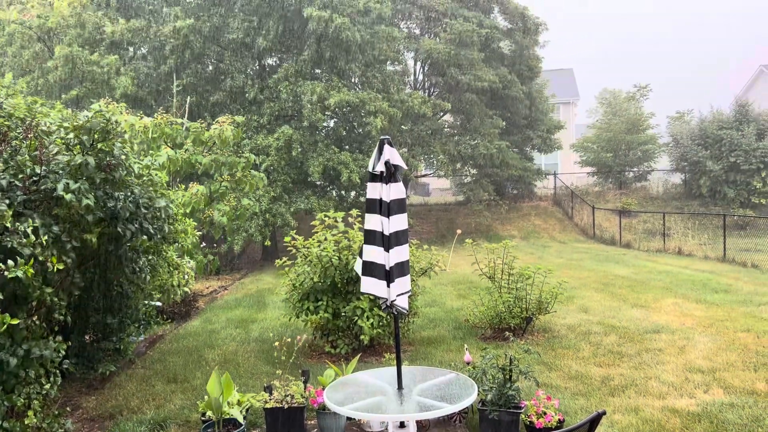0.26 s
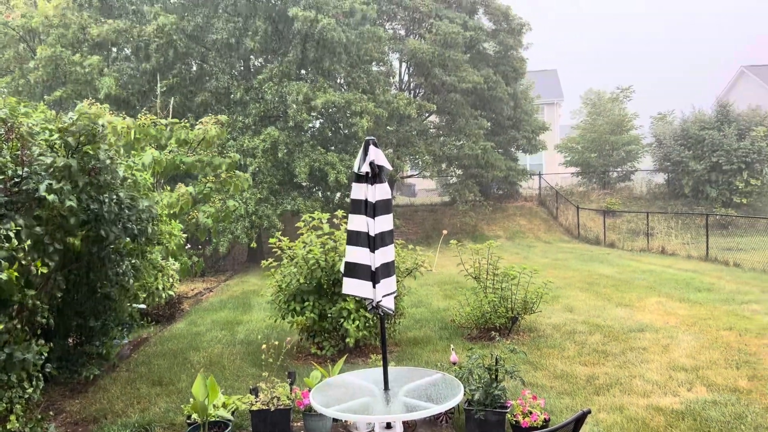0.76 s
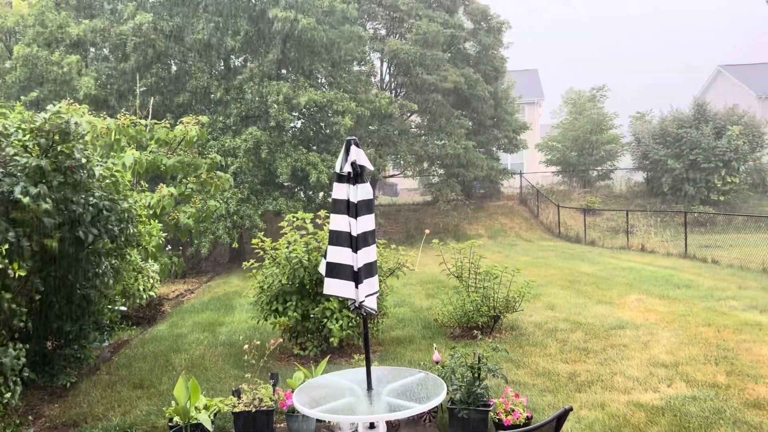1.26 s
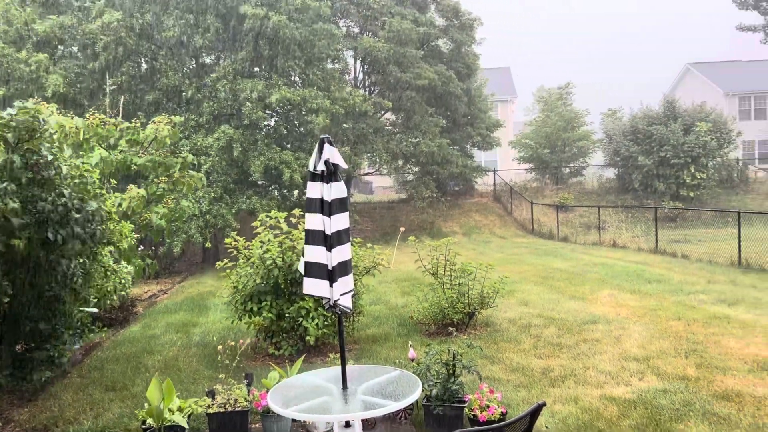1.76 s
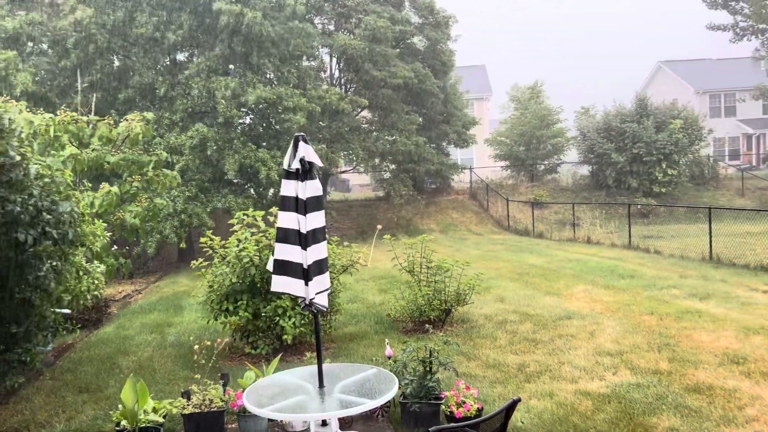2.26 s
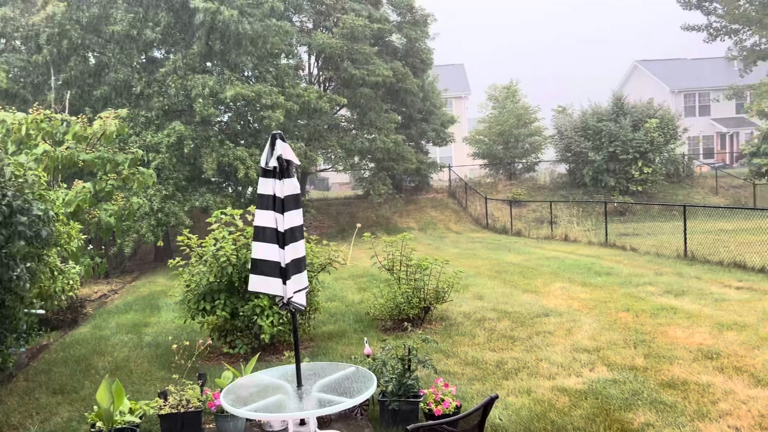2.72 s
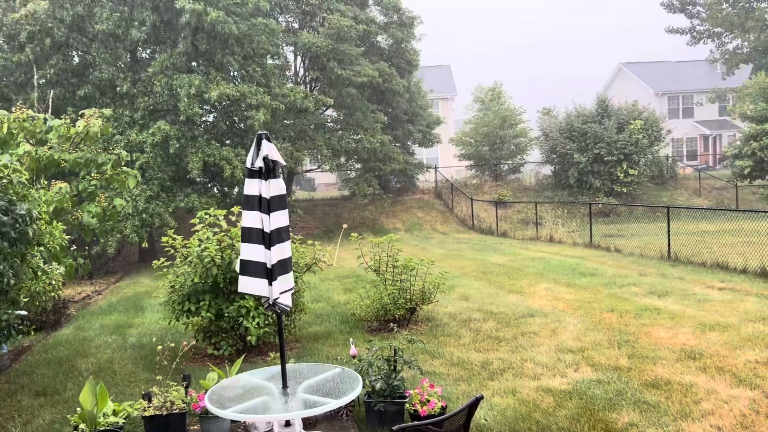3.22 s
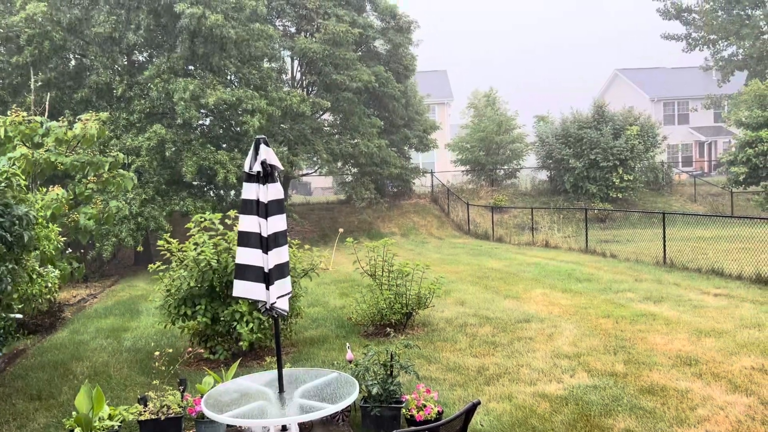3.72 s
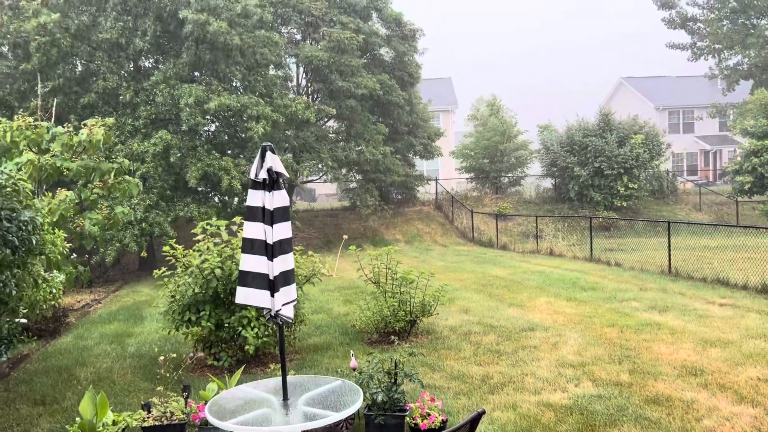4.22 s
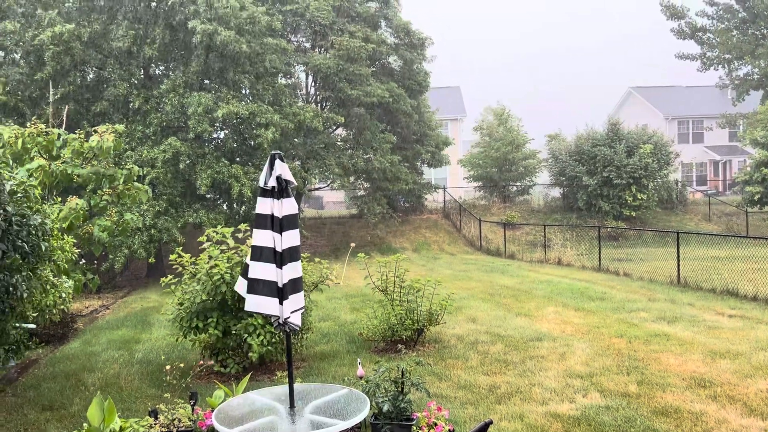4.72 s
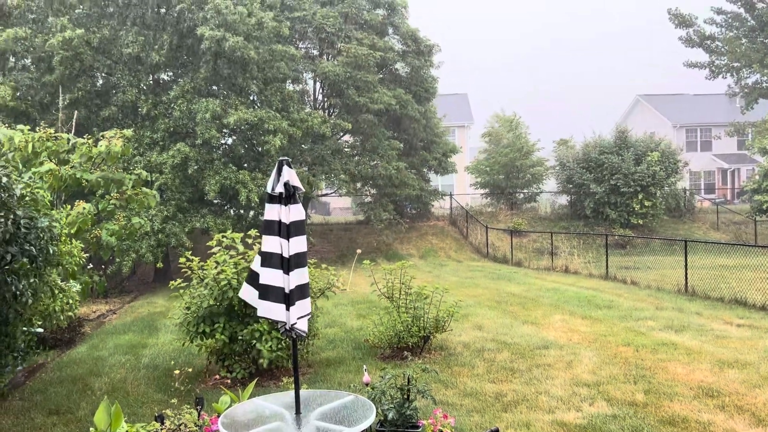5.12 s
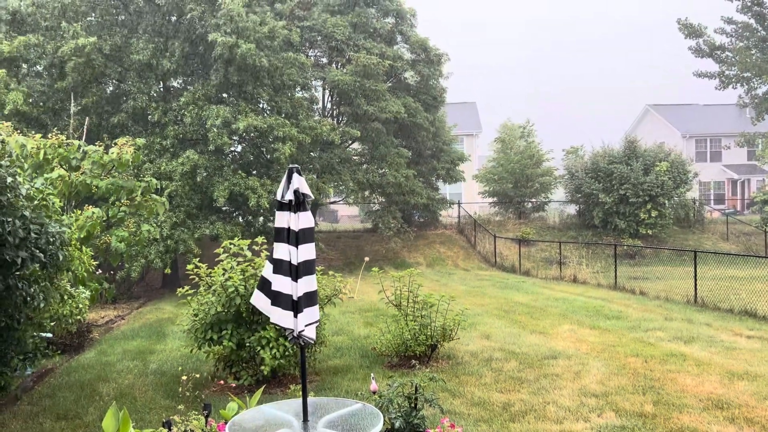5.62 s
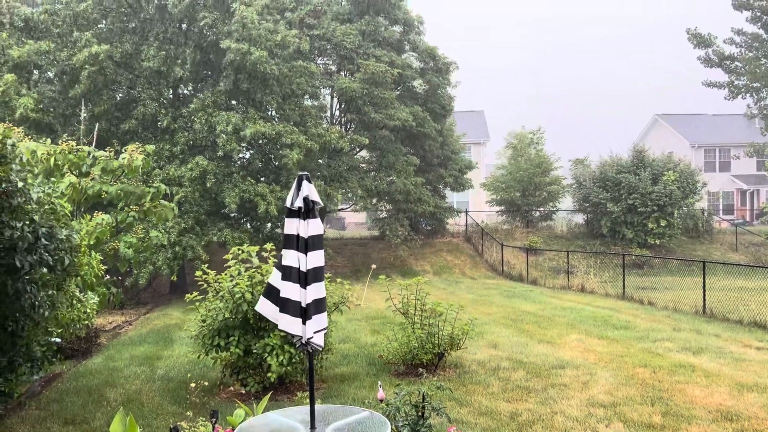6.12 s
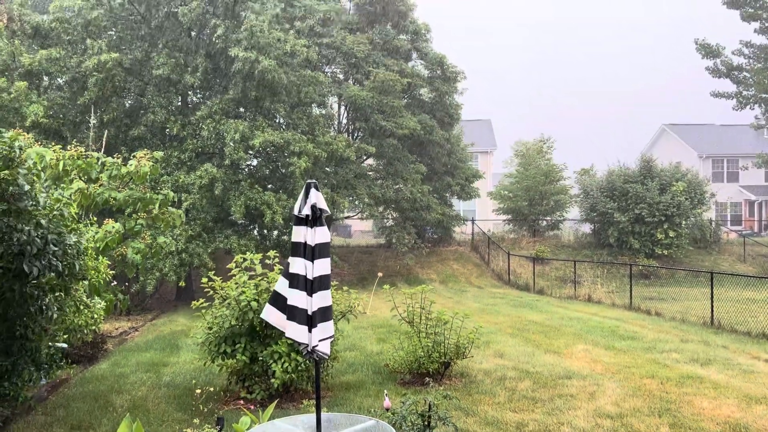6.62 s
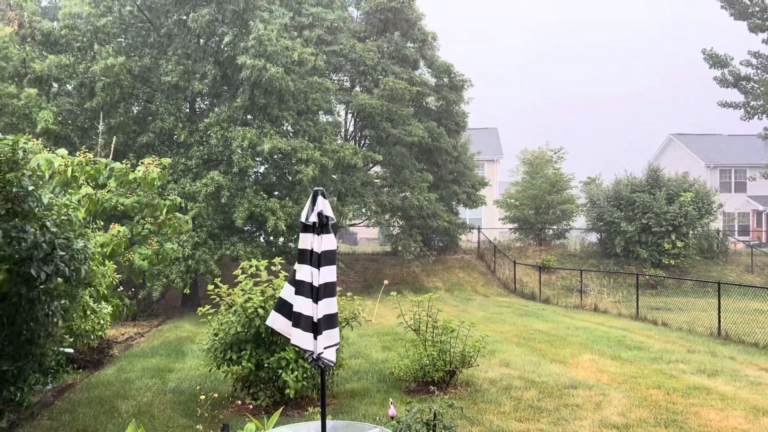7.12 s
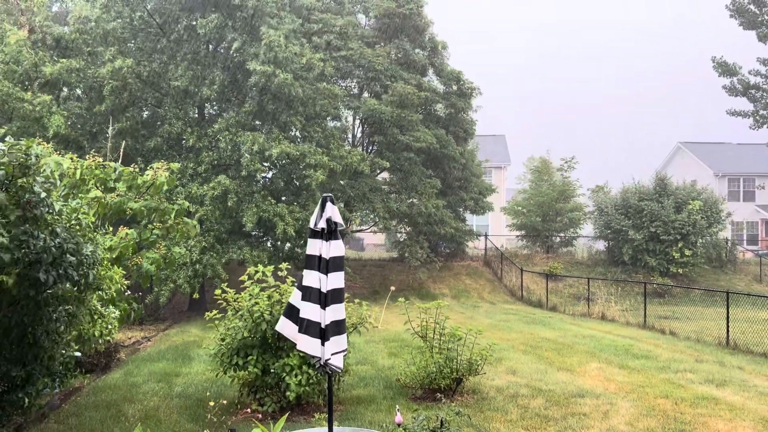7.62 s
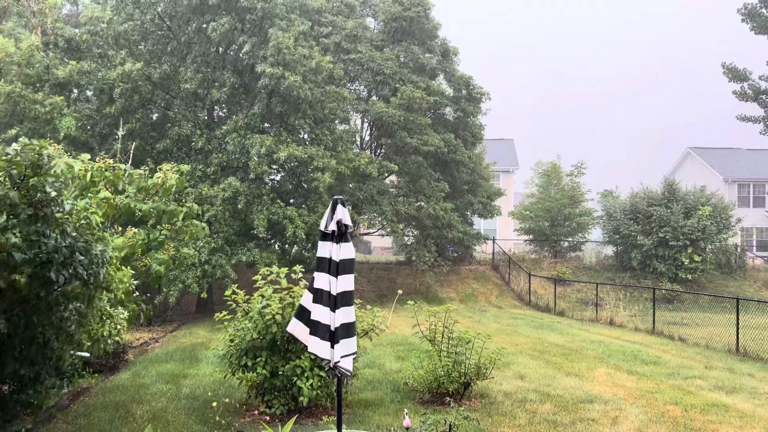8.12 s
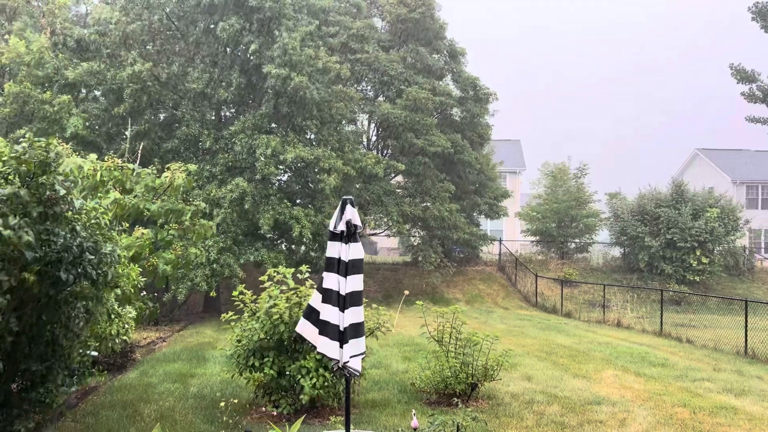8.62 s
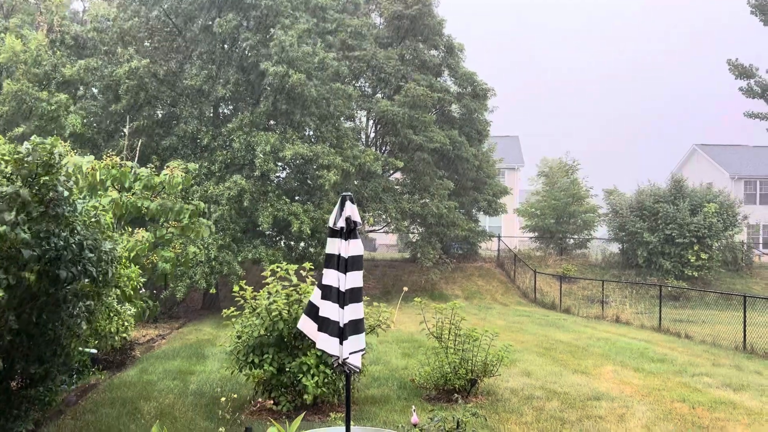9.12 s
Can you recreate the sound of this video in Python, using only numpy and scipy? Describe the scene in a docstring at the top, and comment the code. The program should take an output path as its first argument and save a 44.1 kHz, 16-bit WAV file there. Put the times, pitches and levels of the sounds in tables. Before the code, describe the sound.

Outdoor stereo capture from the back of a house: continuous rain hisses in trees and on lawn, with crisp pattering, watery drips, hollow plops and sharp little ticks up close. Thunder grumbles briefly at first, gives a short low bump around two seconds, goes quiet, then builds into a long uneven roll with deep thumps, peaking near six seconds and trailing off under the unbroken rain.

```python
"""Steady rain on leaves, lawn and patio, heard from the back of a house by two microphone ports.
Far rain is a wash of shaped noise. Nearer drops patter, drip, tap and splat as short dying waves.
Some close drops plop with a dull knock or tick with a tiny burst of bright noise.
Distant thunder arrives as short low pressure waves from each bend of the lightning channel:
many overlap into a rumble, and strong ones stand out as single thumps."""
import sys
import numpy as np
from scipy import signal
from scipy.fft import rfft, irfft, next_fast_len
from scipy.io import wavfile
from scipy.ndimage import uniform_filter1d

SR = 44100
rng = np.random.default_rng(int(sys.argv[2]) if len(sys.argv) > 2 else 0)


def store_pcm(level_fs):
    """Save levels as 16-bit WAV."""
    pcm = np.round(np.clip(level_fs, -1, 1) * 32767).astype(np.int16)
    wavfile.write(sys.argv[1], SR, np.atleast_2d(pcm).T)


N = 412776

# Rumble, swelling and fading in rolls.
# Each row: time in seconds, level in dB, slope above its strongest pitch in dB per octave.
RUMBLE_ROLLS = [(0.0, -27.5, -4.5), (0.15, -40, -10), (0.6, -51, -6), (1.1, -50, 0), (1.8, -50, -7),
                (2.0, -34, -3), (2.2, -42, -7), (2.35, -46, -5), (2.6, -46, -1.5), (2.9, -45, -6),
                (3.15, -57, -13), (3.4, -40, -8), (3.8, -47, 3), (4.1, -41.5, 0), (4.33, -43, 0),
                (4.42, -32, -5), (4.47, -41, -2), (4.55, -32, -6), (4.59, -39, -2), (4.66, -34, -7),
                (4.72, -35, -7), (4.82, -36, -4.5), (4.9, -36, -8), (4.97, -34, -10), (5.03, -36, -5),
                (5.22, -32.5, -7), (5.31, -33, -10), (5.4, -31.5, -5.5), (5.44, -38, -5), (5.51, -36, -10),
                (5.58, -35, -6), (5.68, -38, -8), (5.8, -35.5, -4.5), (6.0, -34.5, -5), (6.06, -36, -2),
                (6.12, -34, -6), (6.18, -30, -7), (6.26, -33, -3), (6.32, -36, -3), (6.43, -30, -3.5),
                (6.55, -37, -2), (6.62, -51, -1), (6.75, -37.5, -1), (6.85, -44, -1), (7.0, -42, -9),
                (7.2, -45.5, -5), (7.42, -36.5, -4), (7.58, -51, -9), (7.68, -48, 1), (7.75, -46, -12),
                (7.83, -41, -3), (8.0, -46, -3), (8.25, -39.5, -3), (8.5, -38, -6), (8.57, -47, -11),
                (8.63, -41, -4), (8.7, -57, -11), (8.8, -47, -6), (8.92, -58, -12), (9.1, -38, -1),
                (9.18, -48, -1), (9.27, -40, 2), (9.36, -58, -12)]
# Single thumps of thunder. Each row: middle in seconds, rough peak in dB, pitch in Hz, length in cycles.
THUNDER_THUMPS = [(0.029, -29, 71, 2.6), (0.052, -24, 167, 1.2), (0.064, -20, 64.6, 1.8),
                  (0.075, -34, 168, 1.9), (0.102, -30, 272, 0.6), (0.135, -31, 153, 0.54),
                  (0.201, -31, 113, 1.6), (0.246, -26, 330, 0.6), (0.306, -24, 330, 0.6),
                  (0.407, -24, 137, 1.2), (0.458, -32, 64, 1.2), (0.998, -27, 300, 0.9),
                  (1.06, -29, 330, 0.6), (1.079, -34, 300, 0.6), (1.175, -31, 78, 1.9),
                  (1.204, -32.5, 264, 5.2), (1.415, -28, 153, 0.98), (1.626, -33, 96, 2.9),
                  (1.942, -29, 273, 0.99), (1.948, -21, 101, 1.1), (1.981, -16.5, 135, 0.9),
                  (2.03, -24, 298, 0.97), (2.047, -30, 114, 1.3), (2.068, -24, 210, 1.3),
                  (2.075, -27, 78, 1.4), (2.088, -34, 204, 1.4), (2.128, -34, 94, 1.3),
                  (2.141, -26, 272, 1.3), (2.216, -28, 153, 0.88), (2.251, -26, 114, 1.9),
                  (2.289, -26, 153, 0.8), (2.388, -31.5, 114, 1.3), (2.591, -29, 152, 1.3),
                  (2.714, -33, 114, 1.4), (2.849, -22, 244, 1.3), (2.853, -30, 123.7, 1.7),
                  (2.872, -21.5, 244, 1.6), (2.914, -32, 88, 2), (2.957, -28, 114, 1),
                  (4.211, -30.5, 79, 3.5), (4.247, -32, 104, 1.3), (4.383, -27, 104, 1),
                  (4.416, -24.5, 71, 2.1), (4.495, -23, 105, 0.57), (4.529, -21, 95, 1.1),
                  (4.546, -24, 60.6, 1.8), (4.613, -30, 90, 1.2), (4.643, -28, 63.5, 2.4),
                  (4.69, -29, 79, 1.9), (4.741, -31, 64, 2.6), (4.782, -24, 78, 0.9),
                  (4.811, -18.5, 77.6, 1), (4.843, -32, 71, 2.1), (4.928, -27, 167, 1.3),
                  (4.959, -25, 86, 0.76), (4.989, -29, 168, 2.4), (5.0, -38, 64, 2.6),
                  (5.044, -30, 127, 1.9), (5.076, -32, 86, 2.1), (5.126, -18, 95, 1.2),
                  (5.188, -24, 114, 1.1), (5.213, -23, 71, 1.2), (5.236, -21, 115, 0.91),
                  (5.254, -29, 114, 1.9), (5.342, -28, 127, 1.5), (5.371, -36, 71, 1.2),
                  (5.4, -21.5, 64, 1.5), (5.457, -25, 72, 1.2), (5.472, -24.5, 128, 1.8),
                  (5.485, -26, 190, 1.3), (5.5, -30, 70, 1.1), (5.525, -23.5, 80, 1.6),
                  (5.614, -25, 139, 1.3), (5.634, -29, 126, 0.73), (5.669, -29.5, 185, 2.4),
                  (5.678, -21.5, 86, 1.1), (5.72, -29, 86, 1.3), (5.815, -33, 58, 2.4),
                  (5.888, -31, 65, 2.3), (5.945, -29.5, 71, 1.5), (5.978, -29, 86, 1.1),
                  (6.013, -30.0, 86, 2.2), (6.086, -19, 77.4, 1.8), (6.11, -22, 139, 2.1),
                  (6.135, -21, 72, 1.3), (6.153, -16, 120, 1), (6.164, -16.5, 187.3, 0.8),
                  (6.18, -11, 78, 1.4), (6.198, -23, 185, 0.6), (6.218, -23, 336, 1.3),
                  (6.224, -16, 72, 1.1), (6.25, -33, 58, 1.3), (6.278, -22.5, 85, 1.3),
                  (6.351, -29, 153, 2.6), (6.365, -34, 58, 2.6), (6.391, -18.5, 139, 1.2),
                  (6.42, -22.5, 93.5, 3.1), (6.441, -20, 178, 2.5), (6.458, -36, 64, 1.9),
                  (6.491, -24, 219, 1.1), (6.559, -36, 64, 2.3), (6.663, -22, 184, 0.87),
                  (6.69, -35, 58, 2), (6.777, -24, 166, 0.7), (6.82, -30, 272, 1.1),
                  (6.933, -27.5, 71, 1.3), (7.003, -31, 94, 1.2), (7.07, -33, 71, 2.3),
                  (7.311, -21.5, 154, 0.78), (7.361, -28, 204, 0.87), (7.388, -29, 86, 2.7),
                  (7.451, -33, 94.5, 2.9), (7.461, -34, 245, 1.6), (7.67, -34, 140, 1.5),
                  (7.69, -33, 70, 1.5), (7.799, -27.5, 150, 0.9), (7.845, -34, 247, 0.6),
                  (8.08, -29, 140, 1), (8.105, -29, 78.4, 1.8), (8.209, -30.5, 205, 2.8),
                  (8.252, -28, 327, 0.6), (8.277, -24, 113.5, 0.69), (8.299, -27.5, 204, 1.1),
                  (8.326, -32, 94, 1.3), (8.376, -28, 103, 2.1), (8.388, -34, 330, 0.75),
                  (8.425, -32, 185, 1.3), (8.437, -31, 86, 1), (8.475, -30, 153, 0.65),
                  (8.495, -32.5, 153, 2.3), (8.535, -36, 70, 1.6), (8.605, -31, 85, 1.4),
                  (8.639, -30, 150, 0.91), (8.761, -31, 70.4, 2.5), (9.008, -31, 77.3, 2.1),
                  (9.059, -31, 64, 2.2), (9.088, -31, 114, 1.2), (9.259, -41, 226, 2.6)]
# Weak returns of each thump from the houses. Each row: delay in seconds, level against the thump in dB.
HOUSE_RETURNS = [(.019, -16), (.034, -17), (.055, -18)]
# Strength of the shower. Each row: time in seconds, level in dB before the layers are mixed.
SHOWER_STRENGTH = [(0.0, -35), (0.23, -35), (2.01, -34.5), (2.42, -36.5), (3.13, -36.5), (3.78, -37.5),
                   (4.61, -36.5), (5.37, -37.5), (5.55, -37.5), (6.44, -37.5), (6.91, -36.5), (7.53, -36.5),
                   (8.39, -36), (9.36, -35)]
# Tone of the far rain. Each row: frequency in Hz, relative level in dB per Hz.
WASH_TONE = [(25, -40), (60, 0.5), (150, 0), (300, -3), (550, -4), (850, 0.5), (1050, -2.5), (1300, -2),
             (1550, -2.5), (2000, -7), (3000, -10), (5000, -12), (6000, -16), (9000, -17), (13000, -21),
             (15800, -19.5)]
# The hollow middle of the rain. Each row: time in seconds, level against the shower in dB.
HOLLOW_SWELL = [(0, 0), (.6, -.5), (.9, 1.5), (1.3, 1), (1.9, 1), (2.6, -0.5), (3.2, 0), (3.9, -1),
                (4.5, 0), (5.2, 0.5), (6, 0), (6.8, 0.5), (7.5, 0), (8, 0), (8.2, 1), (8.45, 1), (8.65, .5),
                (9, 1), (9.36, 0.5)]
# Drips into wet hollows. Each row: pitch in Hz, relative level in dB.
DRIP_TONE = [(450, -16), (900, 10.5), (2000, 5), (5000, -30), (9000, 4)]
# Drops on leaves and stone. Each row: pitch in Hz, relative level in dB.
PATTER_TONE = [(500, -2.5), (900, 5.5), (2000, 1.5), (4000, -6), (7000, -2.5), (12000, -0.5), (15000, -16)]
# Fat drops on the patio. Each row: time in seconds, level of the knock in dB, pitch in Hz.
PATIO_PLOPS = [(0.048, -21, 860), (0.073, -28, 912), (0.155, -30, 1470), (0.239, -22, 926),
               (0.299, -29, 760), (0.306, -31, 1100), (0.335, -32, 800), (0.464, -22, 850),
               (0.495, -25, 1770), (0.667, -24, 915), (0.719, -26, 1030), (0.885, -24, 1070),
               (0.966, -28, 900), (1.036, -21, 840), (1.098, -21, 1365), (1.252, -22.5, 754),
               (1.309, -29, 934), (1.365, -21, 1040), (1.466, -34, 969), (1.509, -36, 820),
               (1.606, -28, 1260), (1.817, -28, 886), (1.971, -28, 1265), (2.224, -30, 818),
               (2.301, -36, 1130), (3.039, -20, 1030), (3.114, -30, 910), (3.165, -21, 1650),
               (3.696, -21.5, 1310), (4.219, -20, 1350), (4.325, -25, 1040), (4.648, -24, 1060),
               (4.695, -23, 920), (4.811, -22, 900), (5.197, -29, 1210), (5.618, -23, 1060),
               (5.707, -23.5, 760), (6.074, -22.5, 930), (6.542, -26, 716), (6.859, -23, 945),
               (7.779, -22, 980), (7.953, -29, 940), (8.115, -28, 734), (8.231, -29, 880),
               (8.461, -22, 805), (8.501, -29, 867), (9.187, -24, 950)]
# Close drops. Each row: time in seconds, level of the splash in dB, thin fizz against splash in dB.
CLOSE_TICKS = [(0.1326, -20, -2), (0.2299, -22, -7), (0.2685, -24, 0), (0.5874, -22, -5), (0.816, -27, 4),
               (0.8425, -20, -6), (0.861, -28, -6), (0.889, -32, -6), (1.2201, -30, 2), (1.347, -20, 4.5),
               (1.4394, -28, -9), (1.6132, -30, 0), (1.6836, -26, -7), (1.8597, -23, -8), (2.0797, -22, -1),
               (2.7596, -27, -8), (2.868, -25, -6), (2.895, -25, -6), (3.0185, -27, -3), (3.274, -30, 3),
               (3.3772, -21, 3), (3.5573, -26, 2), (3.683, -26, 13), (4.144, -26, 4), (4.1624, -23, -3),
               (4.192, -29, 4), (4.482, -33, 2), (4.591, -26, 0), (4.6124, -24, 0), (4.618, -28, -8),
               (4.9492, -25, 2), (5.535, -24, -6), (5.5388, -22, -4), (7.001, -36, -11), (7.3043, -25, -4),
               (7.6143, -23, -11), (7.6187, -26, 1), (7.9064, -28, 2), (8.1529, -27, -4), (8.3484, -31, 2),
               (8.4756, -26, 2), (8.8418, -26, -7), (9.028, -23, -5)]
# Stereo spread by frequency. Each row: frequency in Hz, likeness of left and right from 0 to 1,
# phase lead of the right channel in radians.
STEREO_SPREAD = [(60, 0.8, .01), (350, 0.62, -0.16), (750, 0.24, -0.27), (1230, 0.13, 0.67),
                 (1560, 0.62, 2), (1850, 0.93, 0), (2260, 0.7, 0.4), (3100, 0.72, -1.2), (4870, 0.56, 0),
                 (5500, .33, 1.4), (6600, 0.99, .02), (7340, 0.99, -0.1), (8540, 0.65, 1.43),
                 (9100, 1, 3.1), (10800, 1, 3.2), (11200, .6, 4.8), (11900, 1, 6.25), (13700, 1, 6.32),
                 (14400, .7, 7.8), (14800, 1, 9.3), (15800, 1, 9.5)]
# Stereo balance by frequency. Each row: frequency in Hz, left minus right in dB.
LEFT_OVER_RIGHT = [(350, .2), (770, 1.5), (1300, -.2), (1800, .5), (2740, 2.2), (4200, 3), (6400, .5),
                   (8000, 0)]

WAVES_PER_S = 420  # weak thunder waves in the rumble
TAPS_PER_S, DRIPS_PER_S, DROPS_PER_S, SPLATS_PER_S = 220, 650, 1300, 70
FRONT_DB = -17  # steep front of a thump against its main wave
TAP_DB = -11  # dull tap of a tick against its splash
CLUMP_DB = 2  # nearer drops come in clusters, shaken off the leaves
WALL_S, WALL_DB, WALL_HZ = 0.0075, -5.5, 2170  # the house wall returns near drops, duller
EDGE_HZ = 15750  # top of the band that is kept


def gain_of(db):
    """Turns decibels into a factor."""
    return 10 ** (np.asarray(db) / 20)


def evened(x):
    """Scales a signal to an average strength (rms) of 1."""
    return x / np.sqrt(np.mean(x ** 2) + 1e-20)


def read(points, hz, order=1):
    """Reads a column of a table at any frequency, with straight lines over log frequency."""
    table = np.transpose(points)
    return np.interp(np.log(hz + 1), np.log(table[0] + 1), table[order])


def follow(rows, order=1):
    """Reads a column of a time table, sample by sample."""
    table = np.transpose(rows)
    return np.interp(np.arange(N) / SR, table[0], table[order])


def wander(size):
    """Makes a slow random curve of rms 1, smoothed twice over this many samples."""
    once = uniform_filter1d(rng.standard_normal(N), size)
    return evened(uniform_filter1d(once, size))


def wavelet(hz, cycles, rise):
    """Makes a short wave that rises over a share of its length and dies away."""
    u = np.arange(max(round(2 * cycles * SR / hz), 4)) * hz / SR / cycles
    attack = 1 - np.exp(-u / max(rise, .01))
    fade = np.exp(-3 * u) * np.cos(np.pi * np.minimum(u / 4, .5))
    shape = attack * fade
    return shape / shape.max() * np.sin(2 * np.pi * cycles * u)


def scatter(pitches_hz, per_s, spread_db, cycles, rise, level_db, shared):
    """Drops wavelets at random moments, most small and a few large, on a direct and a side path."""
    happens = rng.random(N) < per_s / SR
    size = gain_of(spread_db * np.minimum(rng.exponential(1, N), 3.5)) * happens
    size = size * rng.choice([-1., 1.], N)
    kind = rng.integers(0, len(pitches_hz), N)
    side = rng.standard_normal(N)
    # the side path has the same moments at random strengths, plus a shifted set of its own
    own = (1 - np.clip(shared, 0, 1)) * np.roll(size, 9001)
    both = evened(np.array([size, size * side + own]))
    out = np.zeros((2, N))
    for k, hz in enumerate(pitches_hz):
        grain = wavelet(hz, cycles * rng.uniform(0.89, 1.77), rise)
        grain = grain / np.linalg.norm(grain)
        train = both * (kind == k) * gain_of(level_db(hz))
        out += signal.oaconvolve(train, grain[None], axes=1)[:, :N]
    return out


def rumble():
    """Many weak waves overlap; long paths through air keep only the lowest pitches."""
    above, below, top_hz = follow(RUMBLE_ROLLS, order=2), 14.0, 58  # slopes in dB per octave

    def level_db(hz):
        """Lets the level change with distance from the strongest pitch."""
        octaves = np.log2(hz / top_hz)
        return (above if octaves > 0 else below) * octaves

    waves = scatter(np.geomspace(40, 330, 12), WAVES_PER_S, 1.9, 2.25, 0.65, level_db, 0.75)
    # even out the chance level over a fifth of a second, then apply the rolls
    level = np.sqrt(uniform_filter1d((waves ** 2).mean(0), size=SR // 5))
    return gain_of(follow(RUMBLE_ROLLS)) * waves / level


def thumps():
    """Strong waves: a steep front, a pitch that sags into a slower pull, weak returns from the houses."""
    out = np.zeros(N)
    steps = np.arange(-3000, 3000)
    t = steps / SR
    for s, peak_db, hz, cycles in THUNDER_THUMPS:
        u = t * hz / max(cycles, .5)
        sagging = 2 * np.pi * hz * t * (1 - 0.16 * np.tanh(u))
        wave = np.exp(-2.8 * u ** 2) * np.sin(sagging + 0.48)
        # the front comes just before the middle of the wave
        front = np.exp(-((t + 0.29 * cycles / hz) / 0.00098) ** 2) * np.sin(2 * np.pi * 290 * t)
        thump = gain_of(peak_db) * (wave + gain_of(FRONT_DB) * front)
        at = round(s * SR) + steps
        out[at[at >= 0]] += thump[at >= 0]
    back = sum(gain_of(db) * np.roll(out, round(s * SR)) for s, db in HOUSE_RETURNS)
    return np.array([out + back, 0.1 * out + 0.36 * np.roll(out, 700)])


def wash():
    """Countless far drops: random short spectra with drifting patches and a treble flicker."""
    frames, hz = N // 128 + 6, np.fft.rfftfreq(512, 1 / SR)
    a, b, c, d, patches = rng.standard_normal((frames, 257, 5)).T
    patches = uniform_filter1d(patches, size=14, axis=0)  # across frequency
    patches = evened(uniform_filter1d(patches, size=8, axis=1))  # across time
    flicker = evened(uniform_filter1d(rng.standard_normal(frames), size=8))
    flicker_db = 1.14 * np.outer(hz / 10000, flicker)  # grows with frequency
    tone_db = read(WASH_TONE, hz)[:, None] + 0.96 * patches + flicker_db
    spectra = np.array([a + 1j * b, c + 1j * d]) * gain_of(tone_db)
    return evened(signal.istft(spectra, nperseg=512, noverlap=384)[1][:, :N])


def taps():
    """Short blunt taps on wet boards and broad leaves, only a cycle or two each."""
    return evened(scatter(np.geomspace(600, 3000, 10), TAPS_PER_S, 1.7, 1.4, 0.046, lambda hz: 0, 0.87))


def drips():
    """Drops into puddles and cupped leaves ring on for a dozen cycles or more."""
    pitches_hz = np.geomspace(450, 9000, 30)
    return evened(scatter(pitches_hz, DRIPS_PER_S, 2.7, 16.5, 0.018, lambda hz: read(DRIP_TONE, hz), 0.59))


def patter():
    """Nearer drops on leaves and stone, each a tap of a few cycles."""
    pitches_hz = np.geomspace(500, 15000, 22)
    return evened(scatter(pitches_hz, DROPS_PER_S, 3.4, 5.0, 0.094, lambda hz: read(PATTER_TONE, hz), 0.5))


def splats():
    """Sparse bright drops burst on the patio, each a thin crack of a few cycles."""
    return evened(scatter(np.geomspace(3500, 11000, 8), SPLATS_PER_S, 3, 3.8, 0.1, lambda hz: 0, 0.88))


def plops():
    """Fat drops: a dull knock of a few cycles with a weaker one about an octave higher."""
    out = np.zeros(N + SR)
    for s, peak_db, hz in PATIO_PLOPS:
        start = round(s * SR) + 40  # about a millisecond after the listed time
        for knock in (wavelet(hz, 5.2, 0.044), 0.5 * wavelet(2.06 * hz, 4.6, 0.048)):
            out[start:][:len(knock)] += gain_of(peak_db) * knock
    return np.array([out[:N], 0.45 * out[:N]])


def ticks():
    """Close drops: a brief bright splash of noise with a thin fizz, over a duller tap."""
    t = np.arange(400) / SR
    bright = signal.butter(2, [5000, 9800], "bandpass", fs=SR, output="sos")
    thin = signal.butter(2, [10000, 15300], "bandpass", fs=SR, output="sos")
    dull = signal.butter(2, [2200, 6000], "bandpass", fs=SR, output="sos")
    out = np.zeros((2, N + len(t)))
    noises = rng.standard_normal((len(CLOSE_TICKS), 2, len(t)))
    for (s, peak_db, fizz_db), noise in zip(CLOSE_TICKS, noises):
        burst = noise * gain_of(-60 * t / 0.009) * np.minimum(t / 0.0003, 1)  # falls 60 dB in 9 ms
        splash, tap = signal.sosfilt(bright, burst), signal.sosfilt(dull, burst)
        fizz = signal.sosfilt(thin, burst)
        high = splash / abs(splash).max() + gain_of(fizz_db) * fizz / abs(fizz).max()
        tick = high / abs(high).max() + gain_of(TAP_DB) * tap / abs(tap).max()
        start = round(s * SR) + 40  # about a millisecond after the listed time
        out[:, start:][:, :len(t) - 40] += gain_of(peak_db) * tick[:, :-40]
    return out[:, :N]


def walled(x):
    """Adds the late, duller return from the house wall."""
    back = signal.lfilter(*signal.butter(2, WALL_HZ, fs=SR), x)
    return x + gain_of(WALL_DB) * np.roll(back, round(WALL_S * SR), axis=-1)


def hollow(x):
    """Lets the band round one kilohertz swell and sink on its own."""
    band = signal.lfilter(*signal.butter(1, [550, 1500], "bandpass", fs=SR), x)
    return x + (gain_of(follow(HOLLOW_SWELL)) - 1) * band


def scene():
    """Mixes all sources on a direct path and a side path."""
    shower_db = follow(SHOWER_STRENGTH)
    thunder = rumble() + thumps()
    drops = gain_of(-12.0) * taps() + gain_of(-9.0) * drips() + gain_of(-7.5) * patter()
    near = gain_of(CLUMP_DB * wander(size=2000)) * walled(drops)
    rain = gain_of(shower_db) * (gain_of(1.42) * wash() + near)
    cracks = gain_of(shower_db - 23.0 + CLUMP_DB * wander(size=3000)) * splats()
    return thunder + hollow(rain) + cracks + walled(plops()) + ticks()


def record(dry):
    """Left takes the direct path, right a blend of both; then phase, balance, bass and treble are set."""
    size = next_fast_len(N)
    hz = np.fft.rfftfreq(size, 1 / SR)
    direct, other = rfft(dry, size)
    alike = np.clip(read(STEREO_SPREAD, hz), 0, 1)
    # long waves reach both ports nearly in step, so the lead shrinks below 500 Hz
    lead = read(STEREO_SPREAD, hz, order=2) * np.minimum(hz / 500, 1)
    # each channel takes half of the phase lead and half of the level difference
    turn = np.exp(.5j * lead) / gain_of(.5 * read(LEFT_OVER_RIGHT, hz))
    blend = alike * direct + np.sqrt(1 - alike ** 2) * other
    stereo = np.array([direct / turn, blend * turn])
    # wind filter cuts the deepest bass, below about 45 Hz
    stereo = stereo * (1j * hz / 45) ** 2 / (1 + 1.3j * hz / 45 - (hz / 45) ** 2)
    out = irfft(stereo, size)[:, :N]
    band_limit = signal.firwin(1023, EDGE_HZ, window=("kaiser", 10), fs=SR)
    return signal.oaconvolve(out, band_limit[None], "same")


dry = scene()
out = record(dry)
store_pcm(out)
```